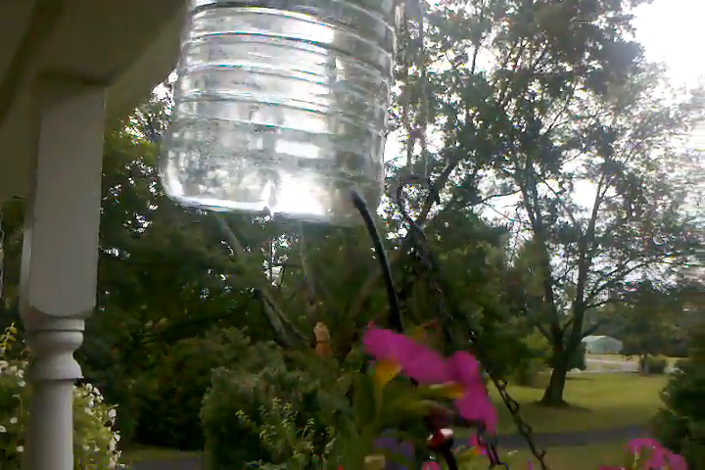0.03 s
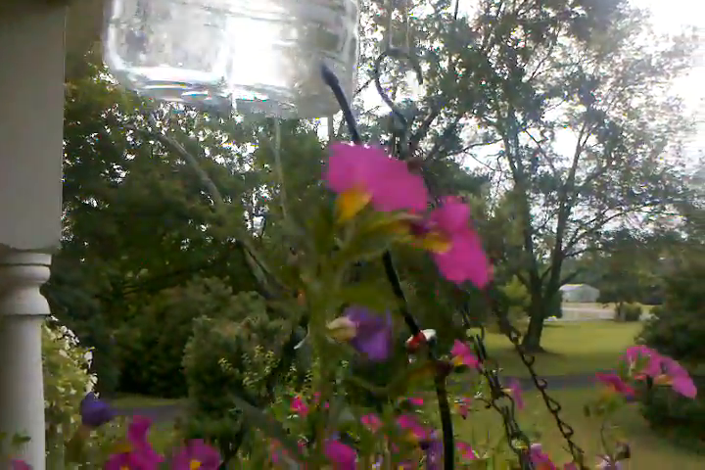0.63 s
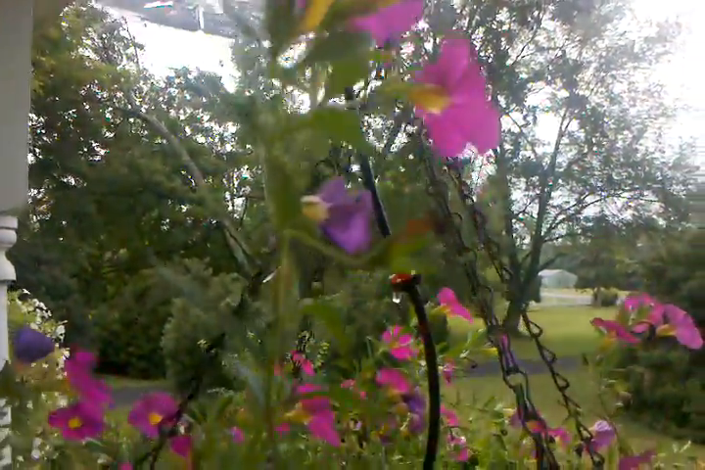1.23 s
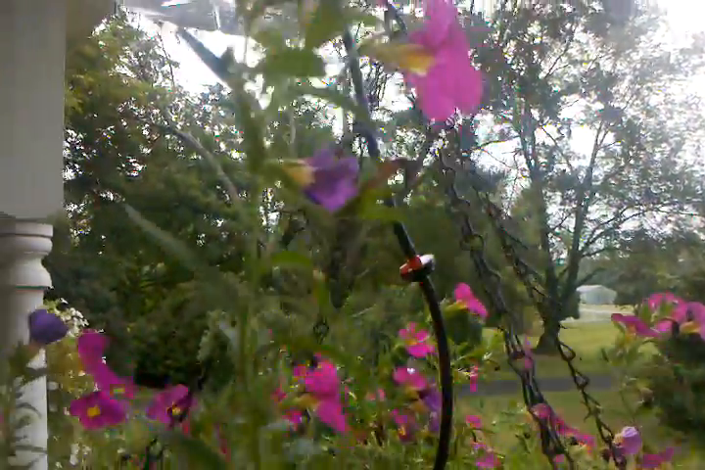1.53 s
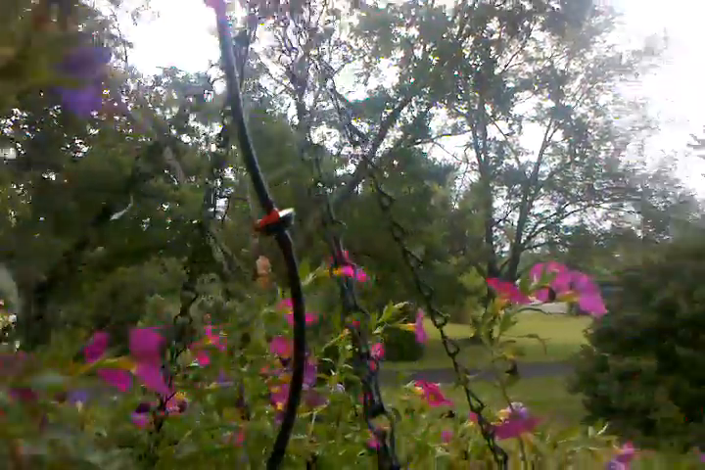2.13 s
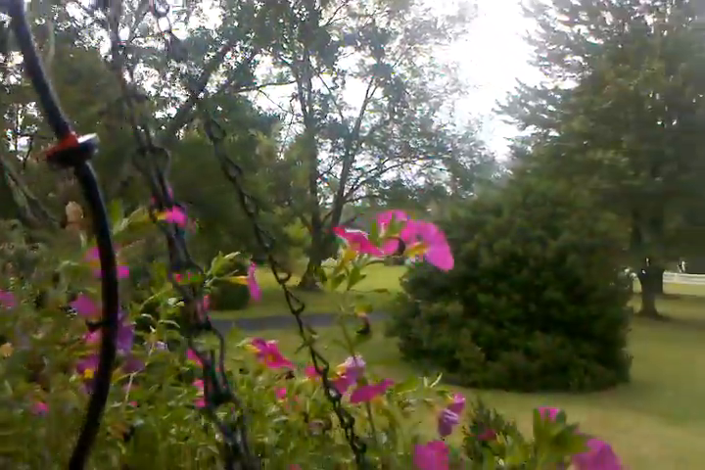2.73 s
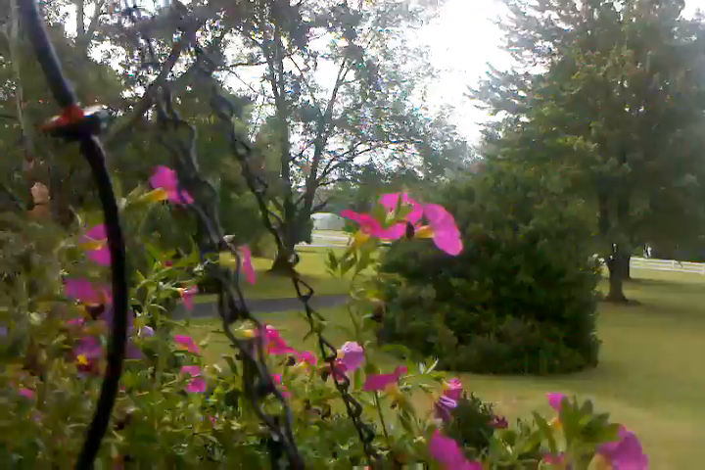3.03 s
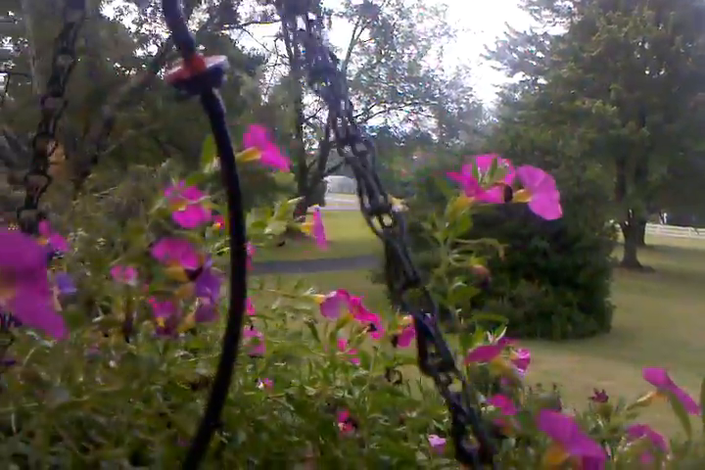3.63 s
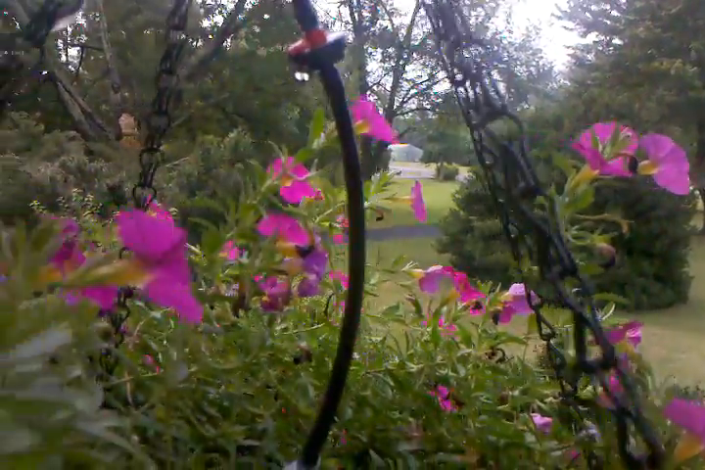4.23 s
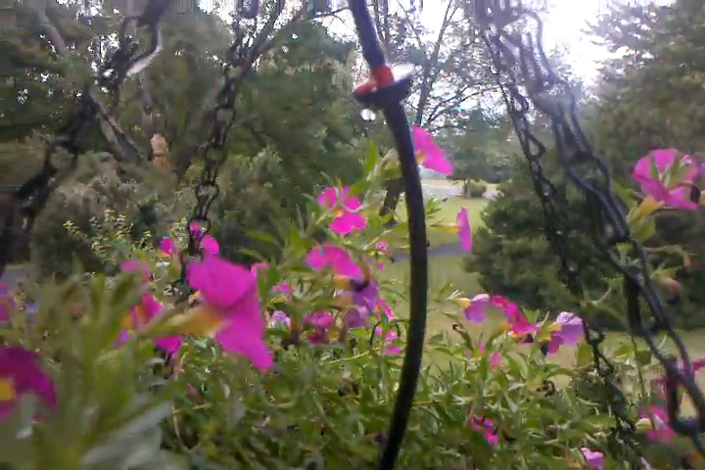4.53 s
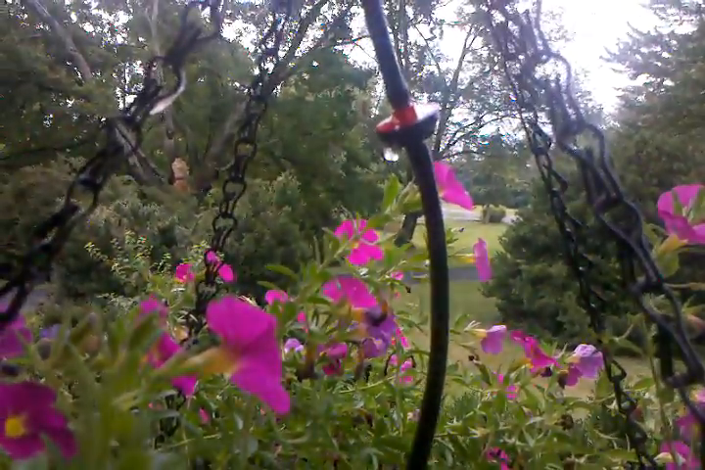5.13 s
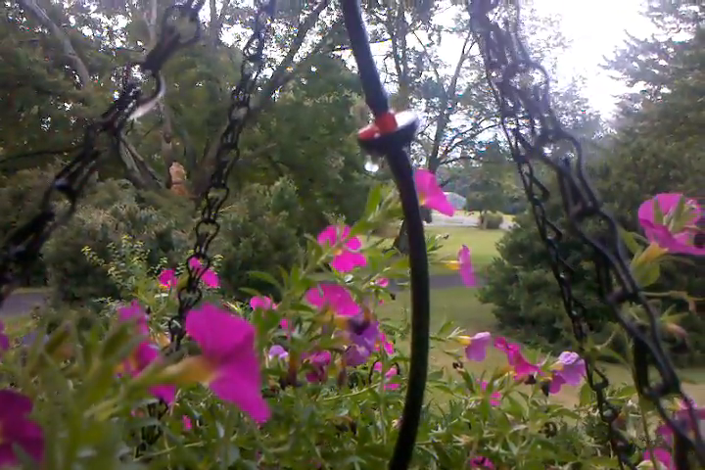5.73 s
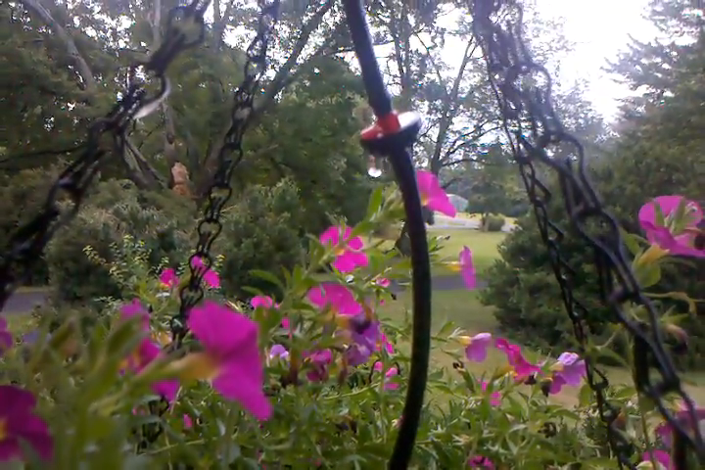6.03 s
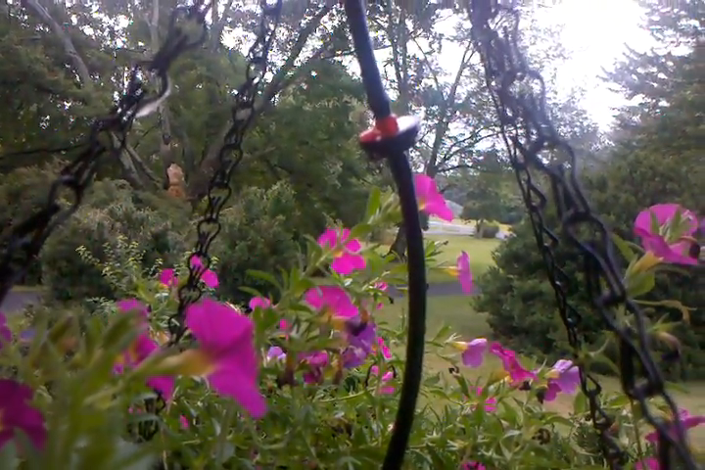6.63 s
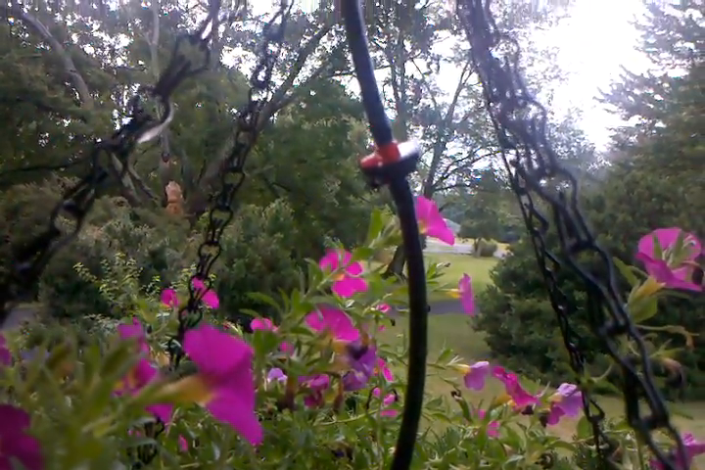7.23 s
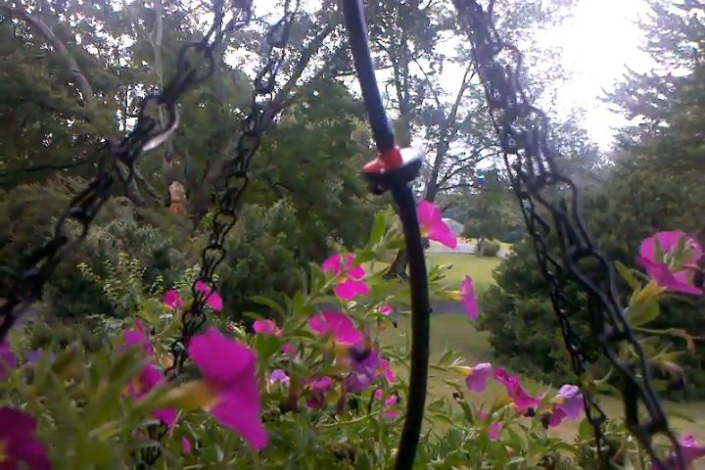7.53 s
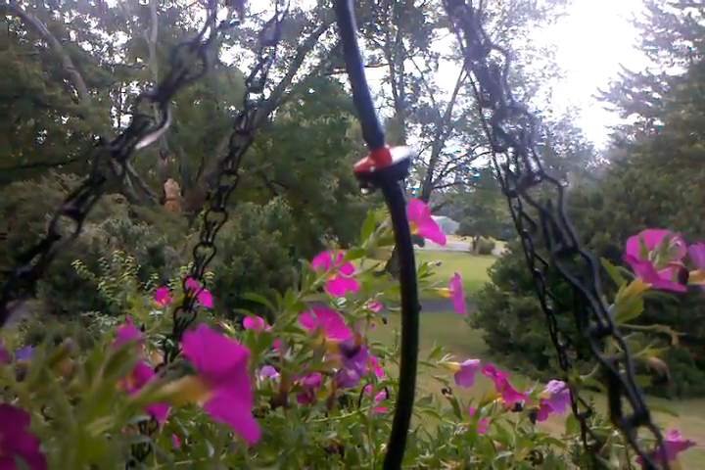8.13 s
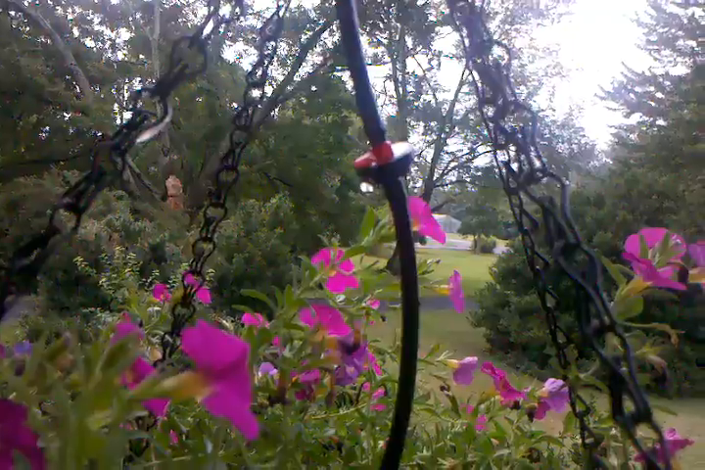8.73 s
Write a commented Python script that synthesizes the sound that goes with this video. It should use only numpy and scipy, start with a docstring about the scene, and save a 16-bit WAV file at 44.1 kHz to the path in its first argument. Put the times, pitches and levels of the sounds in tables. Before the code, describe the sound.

A soft, steady, high hiss of distant insects fills a garden, heard from a porch in wide stereo. Thin whines drift through it, and a faint, very high cricket chirps about seven times a second. Low traffic rumbles and hums far off to the right, slowly drawing nearer throughout. Leaves brush briefly close to the microphone at about 2.2 seconds and again just before 4 seconds. A distant bird gives a few faint chips between 3.5 and 4 seconds and again near 6. A few tiny dry ticks are scattered from 3 seconds on. A nearby cicada gradually emerges from the hiss, then winds up sharply between 5 and 6 seconds into a loud, high buzz that throbs about fourteen times a second. It surges again around 7.5 seconds and dominates until the end, near 9 seconds, with the engine hum a little stronger underneath.

```python
"""A hiss of far insects and a ground cricket's chirps: a late-summer garden, heard from the porch.
Off to the right distant traffic rumbles and hums, slowly drawing nearer. Far birds give faint chips;
leaves brush past close to the microphones, with a few dry ticks. Then a near cicada takes over,
its buckling tymbals winding up to a loud buzz that throbs as its abdomen pumps.
All of it comes through the microphone pair of a small camera that widens the stereo."""
import sys
import numpy as np
from scipy import signal
from scipy.fft import rfft, irfft
from scipy.io import wavfile
from scipy.ndimage import uniform_filter1d

SR = 44100
rng = np.random.default_rng(int(sys.argv[2]) if len(sys.argv) > 2 else 0)


def int16_out(signal):
    """Quantize to a 16-bit WAV file."""
    q = np.round(np.clip(np.atleast_2d(signal).T, -1, 1) * 32767)
    wavfile.write(sys.argv[1], SR, q.astype(np.int16))


N = 392049
TIME = np.arange(N) / SR
HZ = np.fft.rfftfreq(N, 1 / SR)


def amp(db):
    """Decibels to gain."""
    return 10 ** (np.asarray(db) / 20)


def unit(x):
    """Scales to rms 1."""
    return x / np.sqrt(np.mean(x ** 2) + 1e-20)


def spectrum(points):
    """Reads (f/Hz, value) rows on a log-frequency axis."""
    f, value = np.transpose(points)
    return np.interp(np.log(HZ + 1), np.log(f + 1), value)


def curve(rows):
    """Reads (t/s, value) rows at every sample."""
    return np.interp(TIME, *np.transpose(rows))


def white():
    """Unrelated noise at the two microphones."""
    return rng.standard_normal((2, N))


def shape(x, gain):
    """Filters by a gain for each frequency."""
    return irfft(rfft(x) * gain, N)


def below(x, hz, steepness=20):
    """The part of a sound below a frequency."""
    return shape(x, 1 / (1 + (HZ / hz) ** steepness))


def colour(x, points):
    """Gives a white sound of rms 1 a spectrum in dB per Hz."""
    return shape(x, amp(spectrum(points)) * np.sqrt(SR / 2))


def band(x, hz, octaves):
    """Bell-shaped band of a sound, at rms 1."""
    return unit(shape(x, np.exp(-.5 * (np.log2((HZ + 1) / hz) / octaves) ** 2)))


def drift(rate):
    """Smooth random wander of rms 1, changing up to about `rate` times a second."""
    return unit(shape(rng.standard_normal(N), np.exp(-.5 * (HZ / rate) ** 2)))


def reflect(x, wet, decay_s, count=30):
    """Sparse echoes off the porch and the trees, different at each microphone."""
    delay, sign = rng.random((2, count)), rng.choice([-1., 1.], (2, count))
    arrival = np.clip(delay * decay_s * SR, 1, SR // 2 - 1).astype(int)
    taps = np.zeros((2, SR // 2))
    np.put_along_axis(taps, arrival, sign * np.exp(-2 * delay), 1)
    taps *= wet / np.linalg.norm(taps, axis=1, keepdims=True)
    taps[:, 0] = 1  # direct sound
    return signal.oaconvolve(np.atleast_2d(x), taps / np.sqrt(1 + wet ** 2), axes=1)[:, :N]


# The distant road from the porch, before its swells: f/Hz, level/(dB per Hz)
ROAD_SPECTRUM = [(25, -101), (62, -100), (90, -78.5), (120, -82), (150, -69), (178, -77.5), (210, -80.5),
                 (295, -79), (375, -77), (405, -85.5), (650, -90.5), (1000, -94.5), (1600, -99),
                 (4000, -106)]
# Swells of its roar: t/s, level/dB (roar_ref_db leaves the spectrum as it is)
ROAR_LEVEL = [(0.0, -59), (0.1, -65.5), (1.5, -61.5), (1.66, -58), (1.93, -63.5), (2.65, -57.5),
              (3.79, -64.5), (4.65, -59), (5.0, -64.5), (5.2, -62.5), (5.3, -53.5), (5.6, -58.5),
              (6.21, -56.5), (6.6, -63.5), (7, -63.5), (7.3, -62), (8.05, -58.5), (8.4, -53), (8.89, -59.5)]
# Swells of its exhaust drone: t/s, level/dB (likewise against drone_ref_db)
DRONE_LEVEL = [(0, -59.5), (.5, -58.5), (2.2, -60.5), (2.75, -56.5), (3, -64), (3.2, -53.5), (3.7, -58.5),
               (4.2, -61), (4.55, -55), (5.3, -58.5), (5.55, -54), (5.75, -59), (6.3, -54), (6.9, -58),
               (7.5, -49), (7.7, -57.5), (8.3, -51.5), (8.89, -54.5)]


def traffic(roar_ref_db=-59, drone_ref_db=-55, swell_s=0.08, approach_s=5.43):
    """Far traffic draws nearer: rumble and tyre wash grow, roar and exhaust drone swell and sink."""
    road = colour(white(), ROAD_SPECTRUM)
    rumble, below_roar, below_wash = (below(road, hz) for hz in (122, 200, 430))
    drone, roar, wash = below_roar - rumble, below_wash - below_roar, road - below_wash
    rumble_db = -4.5 + 1.1 * TIME
    roar_db = uniform_filter1d(curve(ROAR_LEVEL), round(swell_s * SR)) - roar_ref_db
    drone_db = uniform_filter1d(curve(DRONE_LEVEL), round(swell_s * SR)) - drone_ref_db
    drone_db += 0.5 * drift(rate=3.4)  # the exhaust throbs
    wash_db = -2.5 + 0.5 * TIME + 0.083 * roar_db
    wash_db += 0.83 * np.maximum(TIME - approach_s, 0)  # a car approaches
    return rumble * amp(rumble_db) + drone * amp(drone_db) + roar * amp(roar_db) + wash * amp(wash_db)


# One far engine's hum as it reaches the porch: t/s, relative level/dB
HUM_LEVEL = [(0.0, -66.5), (0.84, -80), (1.93, -64), (3.99, -77), (4.95, -74), (5.12, -61.5), (5.89, -55),
             (6.35, -57), (6.7, -63.5), (7.1, -62.5), (7.7, -54.5), (8.3, -56.5), (8.55, -52), (8.75, -59)]
# Its harmonics: multiple of the firing rate, relative level/dB
HUM_HARMONICS = [(1, -6.5), (2, 1), (3, -15.5)]


def engine(firing_hz=96.8, gain_db=-0.5):
    """The hum of a far engine at steady speed fades in and out on its way through the air."""
    firings = np.cumsum(firing_hz * (1 + 0.00406 * drift(rate=3.74))) / SR
    mic_phase = np.array([[0], [1.1]])  # left, right in radians
    hum = sum(amp(db) * np.sin(2 * np.pi * (multiple * firings + rng.random()) + mic_phase)
              for multiple, db in HUM_HARMONICS)
    return np.sqrt(2) * hum * amp(curve(HUM_LEVEL) + gain_db)


# Far insects all round the garden, before their swell: f/Hz, level/(dB per Hz)
CHORUS_SPECTRUM = [(1500, -118), (2300, -103), (2850, -106), (3300, -96.5), (4100, -94), (4900, -95),
                   (5800, -91), (7000, -91), (7750, -87.5), (8600, -93.5), (9200, -91), (9900, -89.5),
                   (10300, -91), (10650, -99.5), (11500, -104.5), (14000, -107)]
# Their slow swell: t/s, gain/dB
CHORUS_SWELL = [(0, 2), (2, 2.5), (3.5, 4), (5, 6.5), (8.9, 5)]


def chorus(flutter_db=1.5):
    """Many far insects merge into a hiss whose low, middle and high voices flutter separately."""
    hiss = colour(white(), CHORUS_SPECTRUM)
    low, below_high = below(hiss, hz=5600), below(hiss, hz=8600)
    voices = (low, below_high - low, hiss - below_high)
    return sum(voice * amp(flutter_db * drift(rate=20)) for voice in voices) * amp(curve(CHORUS_SWELL))


# Thin whines among the far insects: start t/s, end t/s, f/Hz, width/Hz, level/dB
INSECT_WHINES = [(0, 0.91, 3230, 22, -71.5), (0, 1.95, 4030, 60, -66.5), (0, 1.6, 4470, 55, -68.5),
                 (1.1, 2.4, 7700, 40, -65), (2.45, 2.6, 5420, 18, -70), (2.5, 3.3, 7400, 35, -61),
                 (2.9, 2.6, 6265, 15, -65), (3.7, 4.55, 3850, 35, -66), (3.7, 5.1, 4780, 37, -65),
                 (4.4, 5.9, 4660, 22, -68), (5.6, 7.9, 4360, 15, -64), (6.3, 8.8, 4230, 24, -66),
                 (7.3, 10, 4030, 22, -62), (7.6, 9.4, 12900, 110, -68)]


def whines(fade_s=0.23, wander_hz=10):
    """Thin, breathy tones wander in pitch as they rise out of the hiss and sink back."""
    breath = rfft(white() + 0.93 * rng.standard_normal(N))  # partly shared by both microphones
    bend = wander_hz * np.cumsum(drift(rate=4)) / SR
    tones = np.zeros((2, N))
    for start, end, hz, width, db in INSECT_WHINES:
        flutter = irfft(breath * np.exp(-.5 * (HZ / width) ** 2), N)
        flutter = np.roll(flutter, rng.integers(N), axis=1)  # each whine flutters in its own time
        swell = np.clip(np.minimum(TIME - start, end - TIME) / fade_s + .5, 0, 1)
        tones += amp(db) * swell * unit(flutter * np.sin(2 * np.pi * (hz * TIME + bend)))
    return tones


# Birds far off in the trees: t/s, level/dB, f/Hz
BIRD_CHIPS = [(3.54, -60, 3270), (3.665, -57, 3290), (3.845, -59, 2740), (3.985, -56, 2690),
              (4.075, -51, 3090), (5.835, -59.5, 2070), (5.975, -59, 2070), (6.13, -62, 2080)]


def birds(fall_hz_per_s=6000, half_length_s=0.014):
    """Short falling notes from far away, blurred by the trees."""
    blur = 0.93 * drift(rate=190)
    notes = np.zeros(N)
    for s, db, hz in BIRD_CHIPS:
        t = TIME - s
        phase = 2 * np.pi * (hz * t - fall_hz_per_s * t ** 2 / 2)
        notes += amp(db) * np.exp(-(t / half_length_s) ** 2) * np.sin(phase + blur)
    return np.sqrt(2) * reflect(notes, wet=0.7, decay_s=0.04)


# Faint dry ticks close to the microphones: t/s, level/dB, f/Hz
DRY_TICKS = [(3.078, -55, 1900), (3.251, -58, 1900), (4.112, -57, 2600), (6.362, -50, 1900),
             (7.876, -52, 1700)]


def ticks(decay_s=0.0038):
    """Tiny close knocks that die within milliseconds, nearly alike at both microphones."""
    noise = rng.standard_normal(N) + .6 * white()
    return sum(amp(db) * band(noise, hz, octaves=0.45) * (TIME > s) * np.exp(-abs(TIME - s) / decay_s)
               for s, db, hz in DRY_TICKS)


# Leaves right by the microphones: peak t/s, rise/s, fall/s, level/dB, f/Hz, width/octaves
LEAF_BRUSHES = [(2.162, 0.011, .016, -44, 7130, 0.16), (3.785, 0.021, 0.0097, -46, 7540, 0.26),
                (3.84, 0.058, 0.021, -54, 12000, 0.33), (3.885, 0.03, 0.042, -42.5, 8600, 0.6),
                (4.712, .008, .012, -54, 9500, 0.38)]


def leaves(grain_db=2):
    """Leaves brush past close by, each a rounded swell of fine, grainy friction noise."""
    friction = white() * amp(grain_db * drift(rate=500))
    brushes = np.zeros((2, N))
    for s, rise, fall, db, hz, octaves in LEAF_BRUSHES:
        swell = np.exp(-.5 * np.maximum((s - TIME) / rise, (TIME - s) / fall) ** 2)
        brushes += amp(db) * band(friction, hz, octaves) * swell
    return brushes


# A ground cricket down in the grass, about seven chirps a second: t/s, relative level/dB, f/Hz
CRICKET_CHIRPS = [(0.07, -59.5, 10100), (0.15, -59.5, 10150), (0.22, -59.5, 10160), (0.351, -57.5, 10090),
                  (0.523, -56.0, 10160), (0.64, -59.0, 10200), (0.79, -59.0, 10180), (0.966, -59.5, 10070),
                  (1.105, -53.5, 10100), (1.27, -55.0, 10100), (1.483, -57.0, 10190), (1.665, -58.0, 10080),
                  (1.741, -58.0, 10050), (1.868, -58.0, 10140), (2.057, -53.5, 10180),
                  (2.236, -54.5, 10170), (2.425, -56.0, 10110), (2.624, -56.0, 10070),
                  (2.808, -53.5, 10070), (2.975, -55.5, 10070), (3.157, -54.0, 10060),
                  (3.324, -50.5, 10090), (3.478, -55.0, 10100), (3.607, -55.0, 10010),
                  (3.723, -56.5, 10080), (4.062, -59.5, 9970), (4.151, -57.0, 10070), (4.274, -58.5, 10110),
                  (4.439, -55.5, 10160), (4.559, -51.0, 10070), (4.71, -56.0, 10090), (4.851, -52.5, 10140),
                  (5.012, -53.5, 10100), (5.137, -54.5, 10110), (5.216, -56.5, 10150),
                  (5.291, -56.0, 10140), (5.432, -55.0, 10130), (5.569, -53.0, 10140),
                  (5.728, -56.5, 10090), (5.852, -54.0, 10070), (5.93, -54.5, 10170), (6.151, -55.5, 10150),
                  (6.311, -55.5, 10010), (6.415, -54.5, 10050), (6.592, -54.5, 10200),
                  (6.716, -56.5, 10100), (6.868, -54.5, 10090), (7.137, -57.0, 10150), (7.32, -56.0, 10140),
                  (7.433, -55.5, 10060), (7.548, -56.0, 10110), (7.717, -55.0, 10060),
                  (7.867, -54.5, 10090), (8.002, -56.5, 10050), (8.322, -52.5, 10070),
                  (8.479, -53.0, 10080), (8.618, -53.0, 10040), (8.782, -52.5, 10150)]


def cricket(stroke_hz=125, half_length_s=0.029, sag=0.008, rasp=0.01, gain_db=-0.5):
    """Each chirp is a short run of wing strokes; the raspy tone sags during each stroke of the file."""
    song, scrape = np.zeros(N), rasp * drift(rate=330)
    for s, db, tone_hz in CRICKET_CHIRPS:
        start, pace = rng.uniform(-1.1, 1, 2)
        during = abs(TIME - s) < 2 * half_length_s
        t = TIME[during] - s
        stroke = (t * stroke_hz * (1 + 0.083 * pace) + start) % 1  # 0 to 1 along the file
        hz = tone_hz * (1 - 2 * sag * (stroke - .5) + scrape[during])
        wings = unit(np.sin(np.pi * stroke) ** 2 * np.sin(2 * np.pi * np.cumsum(hz) / SR))
        song[during] += amp(db + gain_db) * wings * np.exp(-(t / half_length_s) ** 4)
    flutter = unit(amp(2 * drift(rate=54)))
    return reflect(song * flutter, wet=0.9, decay_s=0.018)


# Surges in the near cicada's song: middle t/s, rise/s, gain/dB
EFFORT_SURGES = [(5.5, 0.3, 11), (7.6, 0.12, 3)]


def cicada_effort(base_db=-25, creep_db_per_s=1.0966, wake_s=0.76):
    """The cicada's gain: it wakes, then winds up in a slow creep and two smooth surges."""
    waking = 1 - np.exp(-(TIME + 0.11) / wake_s)
    surges_db = sum(db / 2 * (1 + np.tanh((TIME - s) / (2 * rise))) for s, rise, db in EFFORT_SURGES)
    return waking * amp(base_db + creep_db_per_s * TIME + surges_db)


def cicada_throb(peak_s=7.43, rate_hz=13.87, slowing_hz_per_s=0.27, sharpness=2.8):
    """The abdomen pumps in brief spurts of uneven strength, slowing through rate_hz at peak_s."""
    t = TIME - peak_s
    pump = np.cos(2 * np.pi * (rate_hz * t - slowing_hz_per_s * t ** 2 / 2))
    spurts = np.exp(sharpness * (pump - 1)) * (1 + 0.6 * drift(rate=8))
    return spurts - spurts.mean()


# The cicada near the porch, before resonances and effort: f/Hz, level/(dB per Hz)
CICADA_SPECTRUM = [(1500, -112), (2200, -88.5), (2400, -86), (2700, -100), (3300, -80), (4100, -75.5),
                   (4900, -76), (5600, -70), (6300, -68), (6750, -65), (7500, -68.5), (8100, -70.5),
                   (9000, -76), (10200, -81), (10600, -83.5), (14000, -87)]
# Resonances of its hollow abdomen: onset t/s, f/Hz, width/Hz, level/dB relative to the song
ABDOMEN_RESONANCES = [(5.4, 6658, 35, -2), (5.9, 6815, 60, -6), (7.5, 7602, 40, -2)]


def cicada(click_hz=450, click_depth=0.37, throb_db=2.5, flutter_db=1.34, waver_db=3):
    """Tymbals buckle hundreds of times a second; the hollow abdomen rings and makes the song throb."""
    clicks = np.cumsum(click_hz * (1 + 0.13 * drift(rate=30.1))) / SR
    buzz = unit(white() * (1 + click_depth * np.cos(2 * np.pi * clicks)))
    tymbals = colour(reflect(buzz, wet=0.65, decay_s=0.12, count=200), CICADA_SPECTRUM)
    song = tymbals.copy()
    for s, hz, width, db in ABDOMEN_RESONANCES:
        ring = shape(tymbals, 1 / (1 + (2 * (HZ - hz) / width) ** 2))
        onset = np.clip((TIME - s) / 0.23 + .5, 0, 1)
        song += ring * onset * amp(db + waver_db * drift(rate=9))
    throb = cicada_throb()
    core = shape(song, np.exp(-.5 * ((HZ - 7100) / 900) ** 2))
    skirt = (song - core) * amp(-0.5 * throb + drift(rate=24))  # dips slightly on each throb
    lower = below(core, hz=7050, steepness=40)
    # The core's lower and upper voices throb together but flutter separately.
    voices = sum(voice * amp(throb_db * throb + flutter_db * drift(rate=30))
                 for voice in (lower, core - lower))
    return (voices + skirt) * cicada_effort()


# Balance of the garden between the microphones: f/Hz, left minus right level/dB
GARDEN_BALANCE = [(50, 0), (90, -4), (120, 1), (160, -11), (240, -3), (370, -4), (700, -3.5), (1400, -0.5),
                  (3500, -1.2), (6700, -1.4), (9500, 0), (13000, -.3)]


def scene():
    """From the porch: insects all around, traffic and cicada to the right, leaves and ticks up close."""
    garden = traffic() + engine() + chorus() + whines() + birds() + cricket() + cicada()
    pan = amp(np.outer([.5, -.5], spectrum(GARDEN_BALANCE)))
    pan /= np.sqrt(np.mean(pan ** 2, axis=0))
    return shape(garden, pan) + ticks() + leaves()


# What the camera subtracts of each microphone from the other: f/Hz, share (0-1)
WIDENER_SHARE = [(50, 0.4), (110, 0.15), (300, 0.01), (550, 0), (850, 0.76), (1450, 0.9), (2900, 1),
                 (4300, 0.51), (5800, 0.31), (8500, 0.24), (11000, 0.2), (14000, 0.5)]


def record(dry, delay_s=1 / 2910, edge_hz=13900):
    """The camera widens its stereo by subtracting a late copy of the other channel, then cuts the top."""
    late = np.exp(-2j * np.pi * HZ * delay_s)
    share = spectrum(WIDENER_SHARE)
    opposite = shape(dry[::-1], share * late)
    wide = shape(dry - opposite, 1 / np.sqrt(1 + share ** 2))
    lowpass = signal.firwin(1023, edge_hz, window=("kaiser", 9), fs=SR)
    return signal.oaconvolve(wide, lowpass[None], "same")


dry = scene()
out = record(dry)
int16_out(out)
```